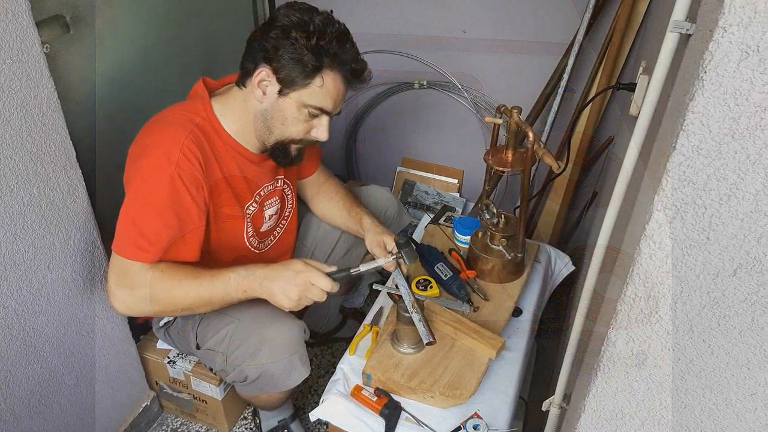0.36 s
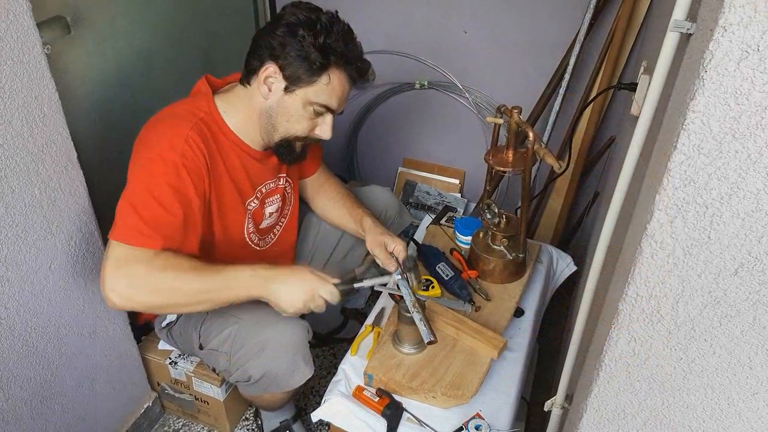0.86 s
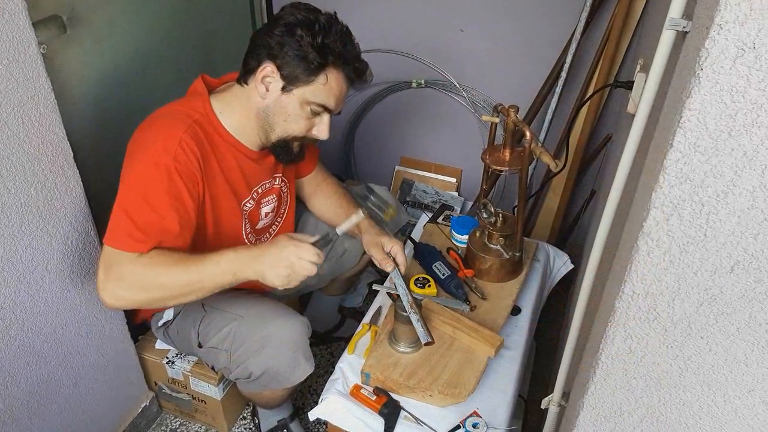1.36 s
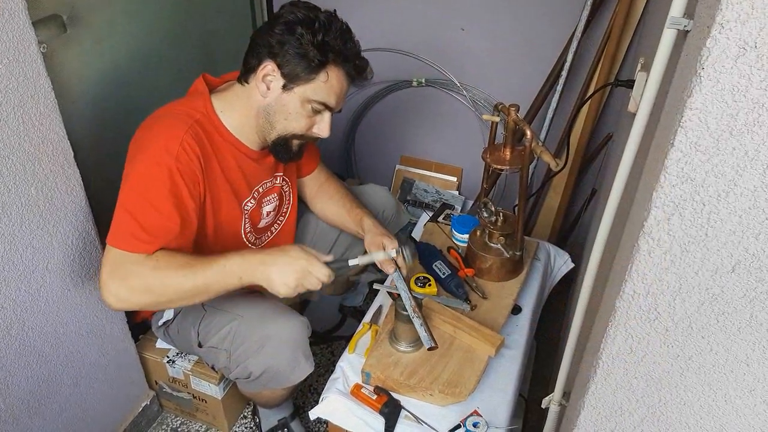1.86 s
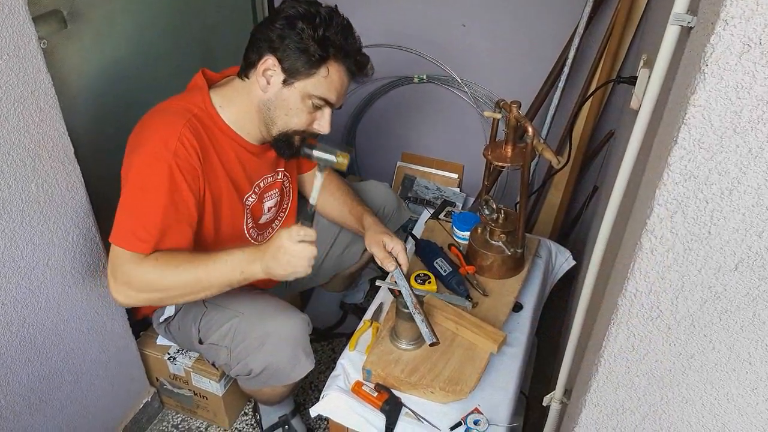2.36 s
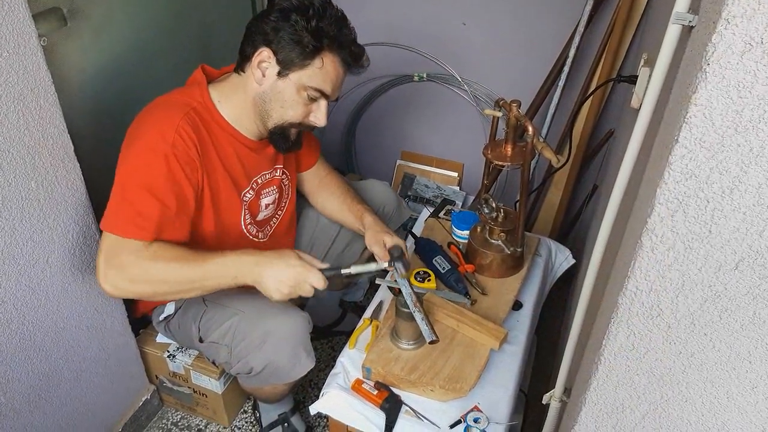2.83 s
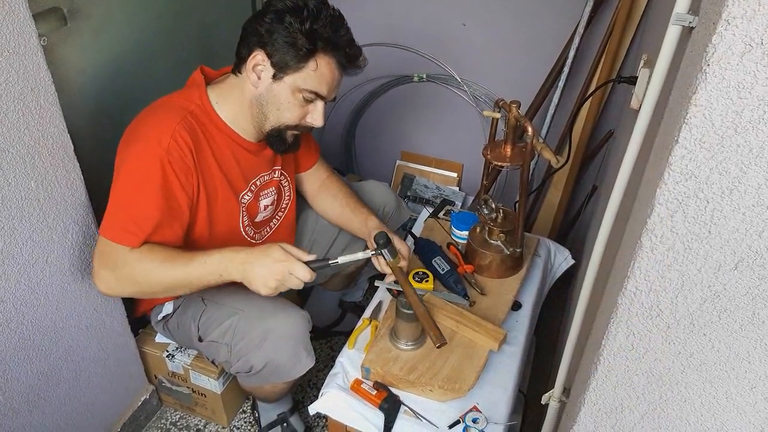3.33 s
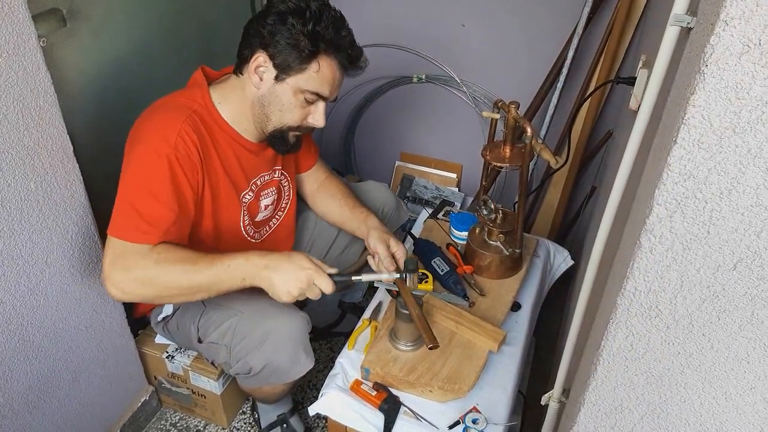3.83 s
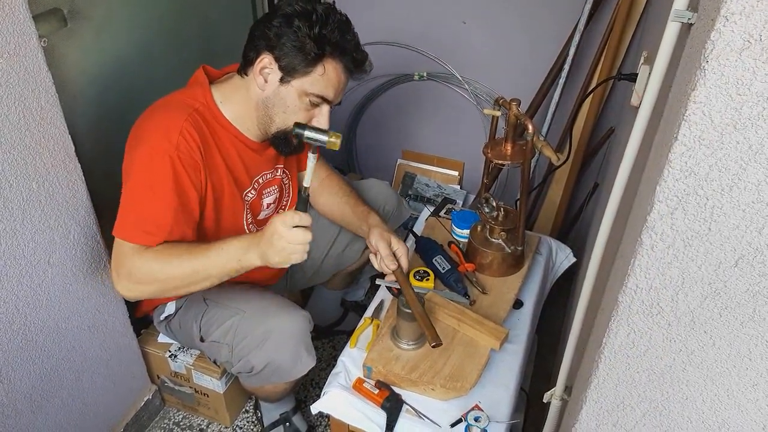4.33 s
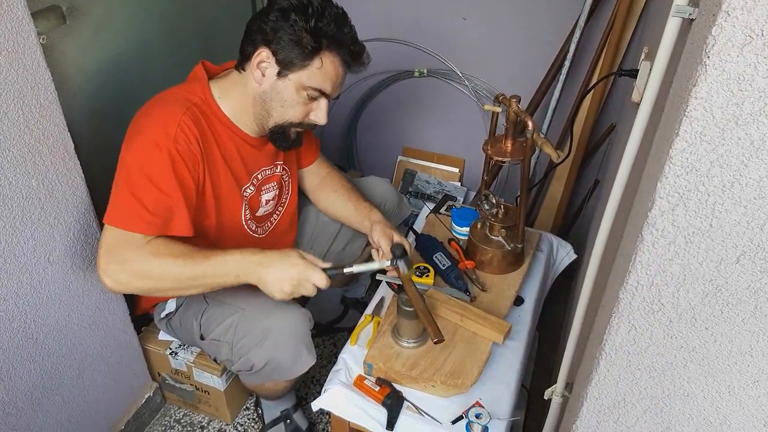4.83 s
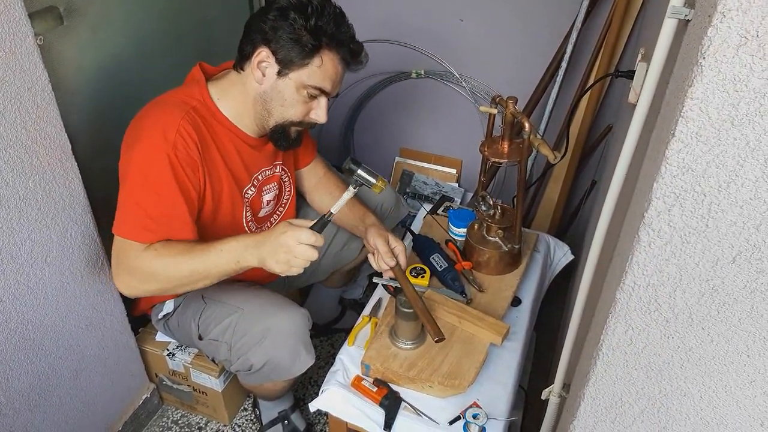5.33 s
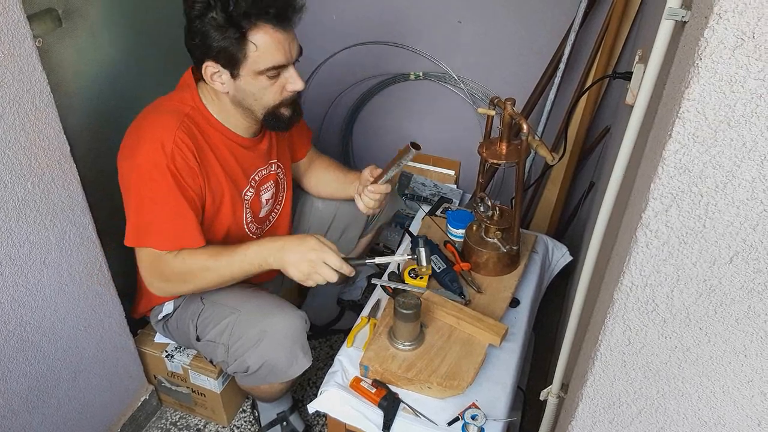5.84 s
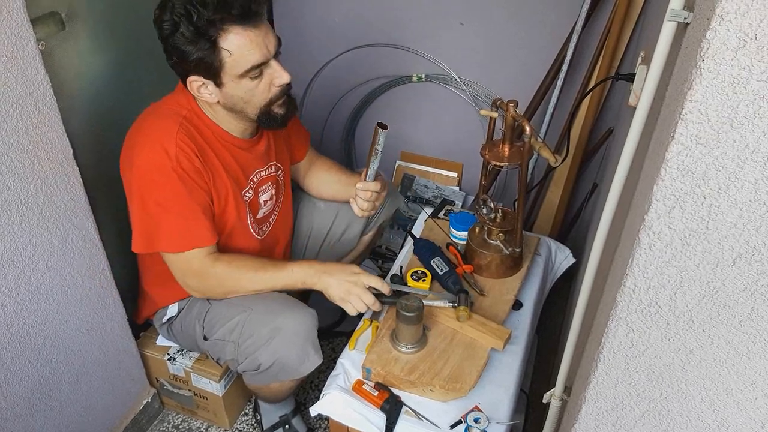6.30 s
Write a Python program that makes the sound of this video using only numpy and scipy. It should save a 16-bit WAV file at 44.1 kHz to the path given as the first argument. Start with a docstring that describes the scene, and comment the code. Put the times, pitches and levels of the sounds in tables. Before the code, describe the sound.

A faint uneven traffic rumble and smooth hiss open the scene in a tight, hard-walled nook. At 0.6 s a small steel hammer hits a short copper pipe held on an iron stake, somewhat lighter at first, then hard at 0.94 and 1.3 s. A very weak tap falls at 1.84 s, followed by strong blows at 2.2, 2.5 and 2.9 s. Each is a bright crack with a short metallic ring, woody knock and low bench thud; pipe and tools rebound and jingle, most heavily around 1.0 s. From 3.24 to 3.83 s the loose pipe clinks in light, clear, irregular touches. Four more hard blows land at 4.2, 4.54, 4.87 and 5.2 s, with dying rattles. A quiet, wavering low drone enters at 5.6 s, sagging and swelling slightly. Soft wooden handle knocks come at 6.15 s and very faintly at 6.33 s. Close small microphone, peaks slightly rounded.

```python
"""Street noise is heard first, then a small steel hammer beats a short copper pipe on an iron stake
that stands on a wooden bench, in a narrow nook. Each blow is a burst of noise with ringing metal and wood;
pipe and loose tools hop and jingle. Between runs the loose pipe clinks, and later the hammer is laid down.
A far drone joins near the end. All is made of shaped noise and decaying sines; the hardest peaks round off."""
import sys
import numpy as np
from scipy import signal
from scipy.fft import rfft, irfft, next_fast_len
from scipy.io import wavfile
from scipy.ndimage import uniform_filter1d, map_coordinates

SR = 44100
rng = np.random.default_rng(int(sys.argv[2]) if len(sys.argv) > 2 else 0)


def materialize(psi):
    """Save the field psi as 16-bit PCM at rate SR to the path in sys.argv[1].

    A 1-D psi becomes a single channel; in a 2-D psi each row is a channel.
    """
    bounded = np.clip(np.atleast_2d(psi).T, -1, 1)
    quanta = np.round(bounded * 32767).astype(np.int16)
    wavfile.write(sys.argv[1], SR, quanta)


def to_linear_factor(level_db):
    """Convert decibel levels (scalar or array-like) to linear amplitude factors."""
    exponent = np.asarray(level_db, float) / 20
    return 10 ** exponent


N = 283959
T = np.arange(SR // 2) / SR  # time axis of one contact, in seconds

# Hammer blows. Each row: start in seconds, relative strength in dB, metal ring in dB above the crack,
# weight (low parts) in dB above the crack, favoured mode in Hz (a value near no mode favours none).
BLOWS = [(0.6003, -7, -19, -17.5, 3403.5), (0.9401, -1.5, -11.5, -9.5, 4), (1.3025, -1.5, -6.5, -8.5, -2),
         (1.84, -26.5, -4.5, -4, 0), (2.2093, -4.5, -8, -8.5, 1751.5), (2.5329, -2, -7.5, -8.5, -1),
         (2.8744, -2, -7.5, -9, 1.5), (4.2038, -3.5, -5, -8.5, 0), (4.5377, -1.5, -9, -10.5, -4),
         (4.872, -1.5, -12.5, -12, 0), (5.204, -4.5, -7, -9, -2)]
# Colour of woody noise. Each row: frequency in Hz, relative level in dB per Hz.
WOOD_COLOUR = [(90, -1), (250, 2.5), (700, -1), (1200, -7), (2000, -7), (3300, -7), (4200, -26),
               (9000, -29), (15000, -52)]


def unit(x):
    """Scale to rms 1."""
    return x / np.sqrt(np.mean(x ** 2) + 1e-20)


def along(points, hz):
    """Read (Hz, value) points on a log frequency axis."""
    f, v = np.transpose(points)
    return np.interp(np.log(hz + 1), np.log(f + 1), v)


def wobble(rate):
    """A smooth random curve with this many knots a second."""
    knots = rng.standard_normal(int(N * rate / SR) + 4)
    return map_coordinates(knots, [np.arange(N) * rate / SR])


def noise(spectrum):
    """Noise of rms 1 with the given colour."""
    m = next_fast_len(N)
    white = rfft(rng.standard_normal(m))
    gain = to_linear_factor(along(spectrum, np.fft.rfftfreq(m, 1 / SR)))
    return unit(irfft(white * gain, m)[:N])


def add(track, s, x):
    """Mix x into track from time s in seconds."""
    track[round(s * SR):][:len(x)] += x


def burst(t60, rise):
    """Envelope of one contact: a quick rise, then a decay of 60 dB in t60 seconds (at least 5 ms)."""
    return to_linear_factor(-60 * T / max(t60, .005)) * (1 - np.exp(-T / max(rise, 1e-4)))


def chatter(t60, rise, share):
    """One firm push, then a dying noise of re-contacts."""
    tail = burst(t60, rise) * rng.standard_normal(len(T))
    return (T == 0) + share * tail / np.linalg.norm(tail)


def ring(modes, push, scatter_db, damp=1, spot_hz=0, free_t60=0, lift_db=10.5):
    """Decaying sines driven by a push; a mode near spot_hz is pulled there, lifted and rings longer."""
    hz, db, t60 = np.transpose(modes)[:, :, None]
    gap = np.abs(spot_hz / hz - 1)
    near = (gap == gap.min()) & (gap < .08)  # the grip can pull a mode 8 % in pitch
    strength_luck, phase, pitch_luck = rng.standard_normal((3,) + db.shape)
    hz = np.where(near, spot_hz, hz * (1 + 0.0042 * pitch_luck))  # the grip retunes the others slightly
    t60 = np.where(near, np.maximum(damp * t60, free_t60), damp * t60)
    decay = to_linear_factor(db + lift_db * near + scatter_db * strength_luck - 60 * T / t60)
    tone = np.sum(decay * np.sin(2 * np.pi * hz * T + phase), axis=0)
    tone = tone * (1 - np.exp(-T / .0006))
    out = signal.fftconvolve(tone, push)[:len(T)]
    loudest = np.sqrt(np.max(uniform_filter1d(out ** 2, size=400)))
    return to_linear_factor(.5 * lift_db * near.any()) * out / loudest


def street():
    """Far traffic: an uneven rumble, a smooth hiss and one wavering drone that sags in pitch and swells."""
    # Each row: time in seconds, hiss level in dB.
    street_levels = [(0.0, -50), (0.9, -50.5), (1.25, -57.5), (1.7, -60.5), (3.1, -60), (3.78, -65),
                     (4.15, -59), (4.7, -61.5), (5.3, -61.5), (5.56, -65), (6.13, -65), (6.44, -59)]
    # Each row: frequency in Hz, relative level in dB per Hz.
    rumble_colour = [(15, -50.5), (25, -21), (43, -19.5), (75, -3), (163, -1), (248, -4), (350, -1),
                     (432, -11), (502, -4.5), (900, -30), (1170, -36), (1980, -120)]
    # Each row: frequency in Hz, relative level in dB per Hz.
    hiss_colour = [(350, -29), (600, -3), (725, -2), (2070, -4), (2750, -8.5), (4170, -10), (6600, -19.5),
                   (8520, -14), (10600, -31.5), (15000, -41.5)]
    seconds, level_db = np.transpose(street_levels)
    time = np.arange(N) / SR
    hiss_db = np.interp(time, seconds, level_db)
    hiss = to_linear_factor(hiss_db + 0.33 * wobble(5.7)) * noise(hiss_colour)

    # the rumble is 1.4 dB over the loudest hiss and swings a little wider
    rumble_db = hiss_db.max() + 1.1 * (hiss_db - hiss_db.max()) + 1.4
    rumble = to_linear_factor(rumble_db + 2 * wobble(8)) * noise(rumble_colour)

    start_s, fade_s, start_hz, sag_hz_per_s = 5.6, 0.051, 173, 13
    start_db, swell_db_per_s = -66, 6.5
    since = time - start_s
    swell = np.clip(since / fade_s, 0, 1) * to_linear_factor(start_db + swell_db_per_s * since)
    hz = start_hz - sag_hz_per_s * since + 3 * wobble(23)
    tone = np.sqrt(2) * np.sin(2 * np.pi * np.cumsum(hz) / SR)  # rms 1
    return rumble + hiss + swell * to_linear_factor(2.6 * wobble(24)) * tone


def nook(x):
    """Close walls: each frequency of the tail dies at its own speed; the tail changes as the man moves."""
    # Each row: frequency in Hz, time to die by 60 dB in seconds.
    nook_decay = [(150, .22), (1000, 0.24), (5000, 0.25), (14000, 0.19)]
    out, step = np.zeros(N + SR), SR // 25  # a new random tail 25 times a second
    hz, t, z = signal.stft(rng.standard_normal((N // step + 1, SR // 3)), SR, nperseg=256)
    fade = to_linear_factor(-60 * t / along(nook_decay, hz)[:, None])
    tails = signal.istft(z * fade, SR, nperseg=256)[1]
    for k, tail in enumerate(tails):
        piece = x[k * step:][:step]
        echo = signal.fftconvolve(piece, tail / np.linalg.norm(tail))
        add(out, k * step / SR + .003, echo)  # 3 ms late
    return out[:N]


def shoves():
    """Each blow sends one deep, short push through the bench legs to the floor: a dying low sine."""
    out = np.zeros(N + SR)
    push = burst(t60=0.048, rise=.003) * np.sin(2 * np.pi * 55 * T)  # 55 Hz
    for s, db, _, weight_db, _ in BLOWS:
        add(out, s, to_linear_factor(db + weight_db - 22.5) * push)
    return out[:N]


def laid_down():
    """The hammer is laid on the bench: short woody knocks of its handle."""
    # Each row: start in seconds, relative strength in dB, time to die by 60 dB in seconds.
    laid_times = [(6.15, -26, 0.053), (6.164, -34, 0.11), (6.334, -49, 0.11)]
    # Modes of the handle. Each row: frequency in Hz, relative level in dB, time to die by 60 dB in seconds.
    handle_modes = [(407, -10.5, 0.055), (704, -6.5, 0.068), (1000, -6, 0.044), (1160, 2, 0.05),
                    (1440, 4, 0.026), (1780, -2, 0.045), (2080, -14, 0.059), (2500, -20, 0.032),
                    (3050, -11, .05), (3300, -19, 0.044)]
    level, rings = np.zeros(N + SR), np.zeros(N + SR)
    for s, db, t60 in laid_times:
        add(level, s, to_linear_factor(db - 10.0) * burst(t60, 0.0021))
        push = chatter(.4 * t60, .001, share=0.9)
        add(rings, s, to_linear_factor(db - 9) * ring(handle_modes, push, scatter_db=1.5))
    return rings[:N] + level[:N] * noise(WOOD_COLOUR)


def clinks():
    """The loose pipe lightly touches metal and rings clearly; the grip damps it more or less."""
    # Each row: start in seconds, relative strength in dB, scrape in dB above the ring,
    # share of the free ring time, favoured mode in Hz (0 = none).
    touches = [(3.241, -43, -10, 1, 0), (3.2572, -31.5, -13, 0.67, 4570), (3.276, -34.5, -31, 0.97, 3680),
               (3.332, -24, -17.5, 0.56, 3638), (3.3494, -30, -19, 0.62, 3682),
               (3.4894, -58, -9, 0.82, 4595), (3.5242, -54, -0.5, 0.55, 4600), (3.553, -51, -13, .55, 0),
               (3.6818, -28, -3, 0.48, 3480), (3.711, -31.5, -10, 0.32, 3124),
               (3.8336, -43, -8.5, 0.34, 3955)]
    # Modes of the free pipe. Each row: frequency in Hz, relative level in dB,
    # time to die by 60 dB in seconds before the grip damps it.
    pipe_modes = [(1180, -5, 0.13), (1450, -11.5, 0.26), (1900, -5, 0.058), (2950, -4, 0.22),
                  (3450, 7, 0.074), (3648, -9, 0.37), (3646, 1.5, 0.078), (3780, 4, 0.15),
                  (4160, -7, 0.091), (4540, 8.5, 0.12), (4780, 3, 0.16), (5180, -5, 0.11),
                  (5980, -2, 0.065), (6400, -5, 0.054), (7370, -2, 0.056), (8080, -10, 0.039),
                  (8550, -18, 0.069), (8825, -1.5, 0.086), (9850, -12, 0.055), (10670, -13, 0.051)]
    # Scrape noise. Each row: frequency in Hz, relative level in dB per Hz.
    tick_colour = [(1500, -22), (3000, -4), (6000, 1), (9400, -2.5), (9900, -13), (12500, -13),
                   (16000, -28)]
    rise_s = 0.0037
    level, rings = np.zeros(N + SR), np.zeros(N + SR)
    for s, db, scrape_db, damp, spot in touches:
        add(level, s, to_linear_factor(db + scrape_db - 4.5) * burst(0.13, rise_s / 3))
        push = chatter(0.038, rise_s, share=1.6)
        tone = ring(pipe_modes, push, scatter_db=3.0, damp=damp, spot_hz=spot, free_t60=0.088, lift_db=9)
        add(rings, s, to_linear_factor(db - 10.0) * tone)
    scrape = noise(tick_colour) + to_linear_factor(0.2) * noise(WOOD_COLOUR)
    return rings[:N] + level[:N] * scrape


def jingle(count=16):
    """After each blow small loose tools tick at chance moments, the later the fainter."""
    # Each row: frequency in Hz, relative level in dB per Hz.
    jingle_colour = [(3000, -40), (5500, -9.5), (7000, 0), (9400, -2), (9900, -8), (13000, -10.5),
                     (16000, -14)]
    span_s, fade_db_per_s = .16, 170
    level = np.zeros(N + SR)
    for s, db, *_ in BLOWS:
        for when, luck in rng.random((count, 2)):
            late = .02 + span_s * when
            tick_db = db - 32.4 + 7.7 * luck - fade_db_per_s * late
            add(level, s + late, to_linear_factor(tick_db) * burst(t60=.055, rise=0.001))
    return level[:N] * noise(jingle_colour)


def contacts(rows, crack, knock, rise, snap_db, tone_db, thud_db, bench_db):
    """Each contact snaps, chatters as three colours of noise and rings metal, stake and bench."""
    # Struck metal held by the hand. Each row: frequency in Hz, relative level in dB,
    # time to die by 60 dB in seconds before the hand damps it.
    metal_modes = [(3006, -12, 0.29), (3330, -11.5, .05), (3425, -1.5, 0.19), (3580, -2.5, 0.036),
                   (3540, 0, 0.065), (3567, 0.5, 0.14), (3770, -4.5, .06), (3957, 2.5, 0.065),
                   (4200, -2, 0.15), (4290, -9.5, 0.19), (4606, -4, 0.19), (4950, -6, 0.12),
                   (4898, -21, .05), (6200, -11.5, 0.05), (6340, -6, 0.074), (6780, -8, 0.18),
                   (6760, -10.5, .05), (7420, -11, 0.021), (9050, -10.5, .05), (8650, -10.5, 0.032),
                   (9100, -14, 0.032)]
    # Iron stake. Each row: frequency in Hz, relative level in dB, time to die by 60 dB in seconds.
    stake_modes = [(997, -7, 0.096), (1057.3, -3.5, 0.041), (1187, 0, 0.042), (1474, -8.5, 0.12),
                   (1737, -2.5, 0.07), (1780, -6.5, 0.13), (2120, -8, 0.079), (2360, -1.5, 0.043)]
    # Bench top. Each row: frequency in Hz, relative level in dB, time to die by 60 dB in seconds.
    bench_modes = [(135.8, -1, .4), (192.7, 2, .22), (266.7, -7.5, 0.32), (314, -18.5, 0.33),
                   (520, -2.5, 0.18), (652, -1.5, 0.22)]
    # Dull thud noise. Each row: frequency in Hz, relative level in dB per Hz.
    thud_colour = [(25, -20.5), (90, -25), (130, 0), (300, 0.5), (650, 2.5), (1200, -21), (3000, -56)]
    t60 = 0.096  # decay of the crack's re-contacts in seconds; the other parts scale it
    level, rings = np.zeros((3, N + SR)), np.zeros(N + SR)
    for s, db, ring_db, weight_db, spot in rows:
        low_db = db + weight_db  # weight feeds the low parts
        snap = to_linear_factor(snap_db) * burst(0.011, rise / 4)
        add(level[0], s, to_linear_factor(db - 5.5) * (burst(t60, rise) + snap))
        # lower sounds build up more slowly and last longer
        add(level[1], s, to_linear_factor(low_db - 1.4) * burst(1.126 * t60, 2.7 * rise))
        add(level[2], s, to_linear_factor(low_db + thud_db) * burst(1.477 * t60, 6 * rise))

        push = chatter(0.76 * t60, 4 * rise, share=1.7)
        metal = ring(metal_modes, push, scatter_db=3.0, damp=0.72, spot_hz=spot, free_t60=.22)
        add(rings, s, to_linear_factor(db + ring_db + tone_db - 3.5) * metal)
        push = chatter(0.82 * t60, 4 * rise, share=2.2)
        stake = ring(stake_modes, push, scatter_db=0.5, spot_hz=spot, free_t60=0.069)
        add(rings, s, to_linear_factor(low_db + tone_db - 9.5) * stake)
        push = chatter(t60 / 3, rise, share=.4)
        bench = ring(bench_modes, push, scatter_db=1.5, spot_hz=spot)
        add(rings, s, to_linear_factor(low_db + bench_db) * bench)
    colours = (crack, knock, thud_colour)
    return rings[:N] + sum(env[:N] * noise(colour) for env, colour in zip(level, colours))


def landings():
    """Pipe and tools land again after a hop; a heavier landing rings the metal more. The first row is instead a
    second contact of the first blow, and the last an airy tick as the hammer is laid down."""
    # Each row: start in seconds, relative strength in dB, weight in dB above the rattle,
    # favoured mode in Hz (0 = none).
    hops = [(0.604, -28, 12, 495), (0.7261, -29.5, -10.5, 1400.5), (0.7804, -31.5, -14, 0),
            (0.9594, -8, -1, 0), (0.9894, -11, 0.5, 1118), (1.0088, -9.5, -8, 0), (1.0964, -34.5, -16.5, 0),
            (1.1439, -38.5, -9.5, 0), (1.3678, -16, -7.5, 0), (1.4, -30, -22, 0),
            (1.4236, -35, -15, 2197.5), (1.4686, -39, -16, 0), (1.8819, -39, -17.5, 0),
            (1.9455, -43, -12.5, 0), (2.2797, -20, 0.9, 0), (2.345, -31.5, -18, 0), (2.3726, -42.5, -5, 0),
            (2.5914, -25.5, 8, 1100), (2.6231, -27.5, -7.5, 0), (2.7057, -47, -4, 0), (2.9393, -26.5, 6, 0),
            (2.9888, -32.5, -23, 0), (3.0442, -41, -22, 0), (3.7487, -50, -7.5, 0),
            (3.7844, -51.5, -10.5, 0), (4.2219, -8, -3.5, 658), (4.2597, -16.5, 6, 1041),
            (4.2787, -15.5, -13.5, 0), (4.3524, -32.5, -10, 0), (4.405, -40.5, -9.5, 0),
            (4.594, -18, 1.5, 1474), (4.6295, -22, -21.5, 0), (4.9365, -25.5, 5, 1476.5),
            (5.0949, -40, -13.5, 0), (5.2672, -21, -3.5, 0), (5.3444, -40, -31, 0), (5.3842, -45.5, -9, 0),
            (5.4291, -47, -10, 0), (6.185, -47.5, -25, 0)]
    # Bright rattle. Each row: frequency in Hz, relative level in dB per Hz.
    rattle_colour = [(1500, -29), (3000, -5), (5500, -7), (7000, -3.5), (9400, -1), (9900, -11),
                     (13000, -11), (16000, -14)]
    # Lower clatter. Each row: frequency in Hz, relative level in dB per Hz.
    clatter_colour = [(500, -23.5), (850, -4), (1150, 1.5), (1500, -5), (2400, -9), (3500, -10.5),
                      (6000, -38)]
    rows = [(s, db, -7 + .55 * weight, weight, spot) for s, db, weight, spot in hops]
    return contacts(rows, rattle_colour, clatter_colour, rise=0.0026, snap_db=-10.5,
                    tone_db=-5, thud_db=-5.5, bench_db=-10.5)


def blows():
    """The hammer strikes: a sharp crack and a knock, with ringing pipe, stake and bench."""
    # Bright crack. Each row: frequency in Hz, relative level in dB per Hz.
    crack_colour = [(1500, -30), (2800, -4), (5000, -2), (9400, -1.5), (9900, -11.5), (13000, -14.5),
                    (16000, -15)]
    # Lower knock. Each row: frequency in Hz, relative level in dB per Hz.
    knock_colour = [(500, -24.5), (850, -3.5), (1500, 1.5), (2500, 1), (4000, -13), (8000, -39)]
    return contacts(BLOWS, crack_colour, knock_colour, rise=0.0016, snap_db=-3.0,
                    tone_db=-0.5, thud_db=-2, bench_db=-9)


def scene():
    """Bench sounds with their echo, over the floor pushes and the street."""
    bench = blows() + landings() + jingle() + clinks() + laid_down()
    low_hz = 100  # a small bench radiates no deep bass
    bench = signal.sosfilt(signal.butter(2, low_hz, "highpass", fs=SR, output="sos"), bench)
    return (bench + to_linear_factor(-14.5) * nook(bench) + shoves() + street())[None]


def band_limit(x):
    """A steep low-pass at the top of the band."""
    return signal.sosfilt(signal.butter(12, 16810, fs=SR, output="sos"), x)


def record(dry):
    """A small camera microphone: the treble ends steeply and the input stage rounds off the hardest peaks."""
    top_hz, ceiling, hardness = 15850, .98, 5
    x = signal.sosfilt(signal.ellip(10, .5, 60, top_hz, fs=SR, output="sos"), dry)
    rounded = x / (1 + np.abs(x / ceiling) ** hardness) ** (1 / hardness)
    return band_limit(rounded)


dry = scene()
out = record(dry)
materialize(out)
```